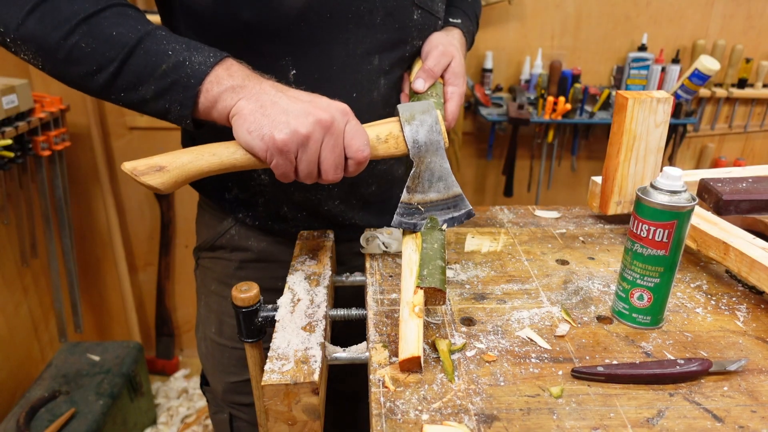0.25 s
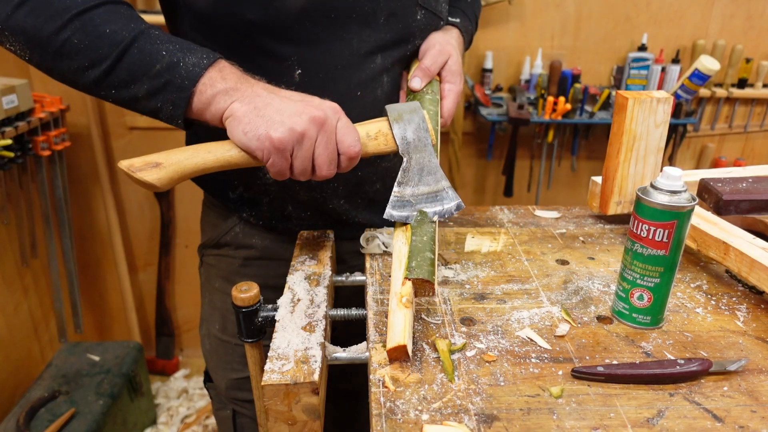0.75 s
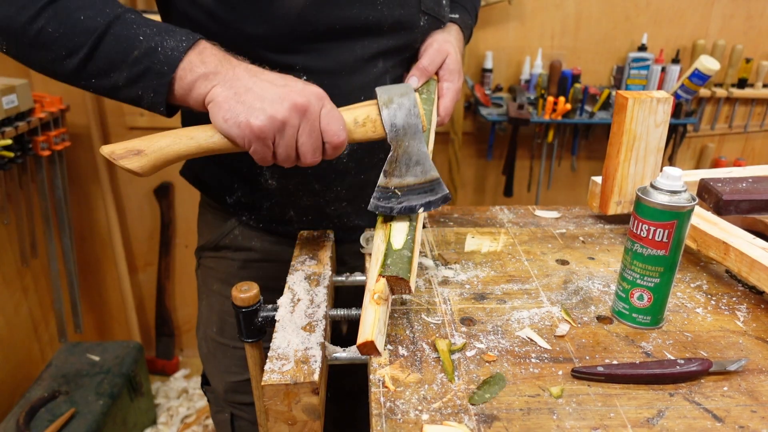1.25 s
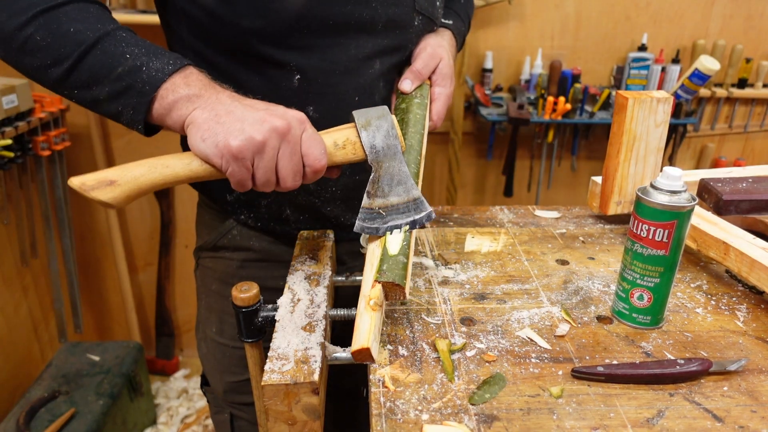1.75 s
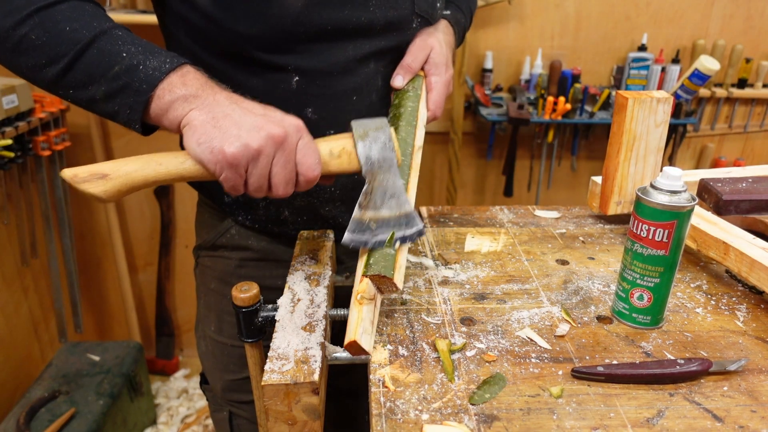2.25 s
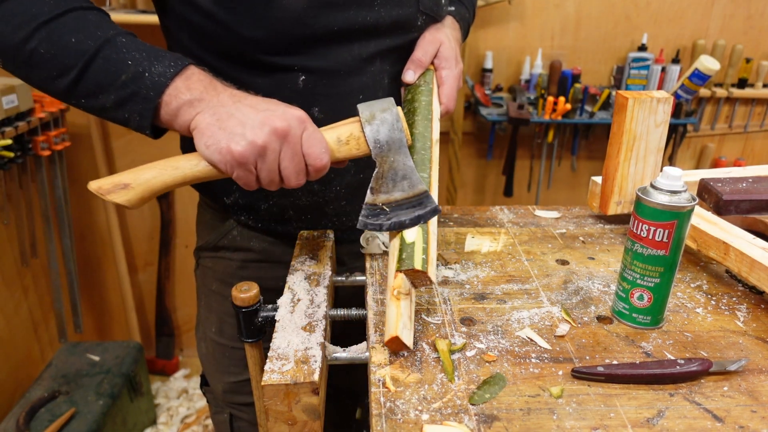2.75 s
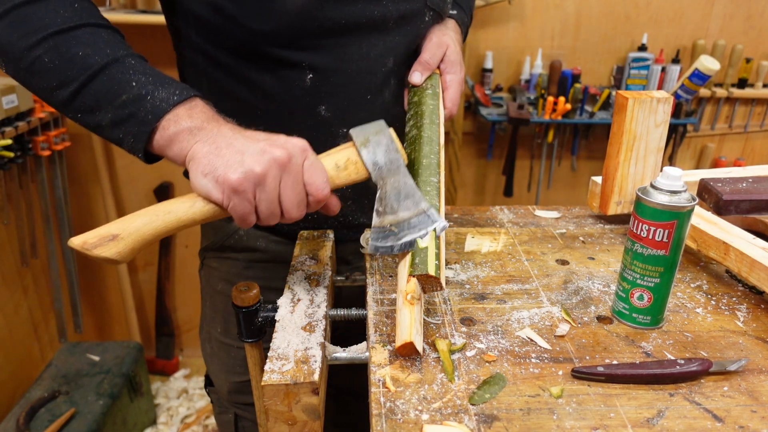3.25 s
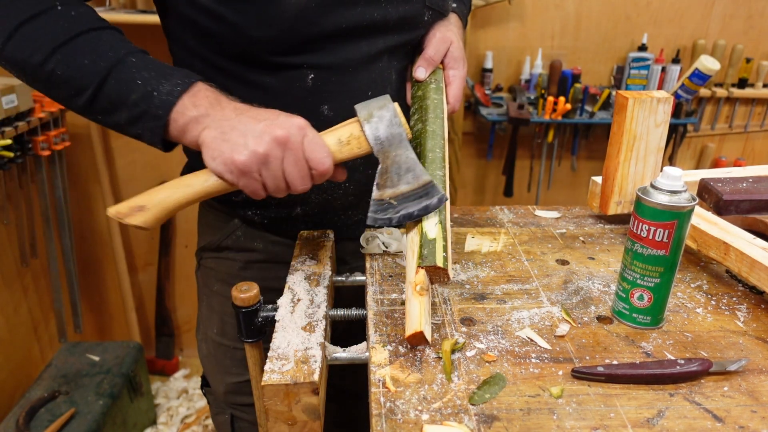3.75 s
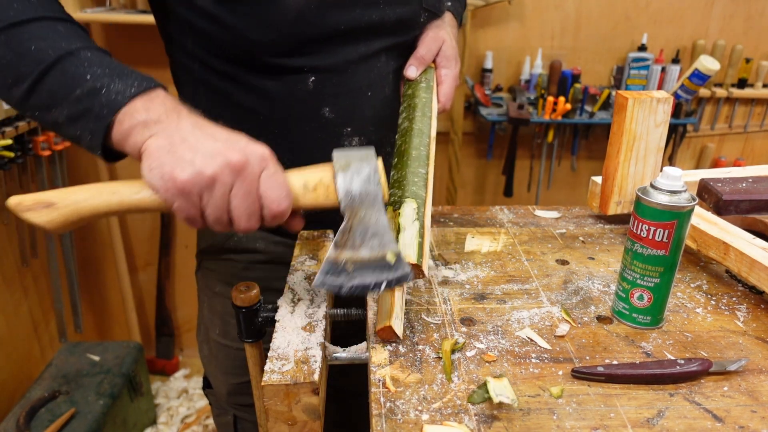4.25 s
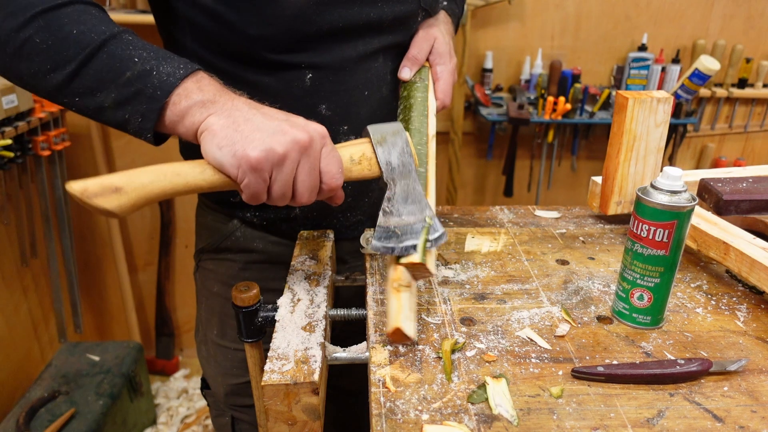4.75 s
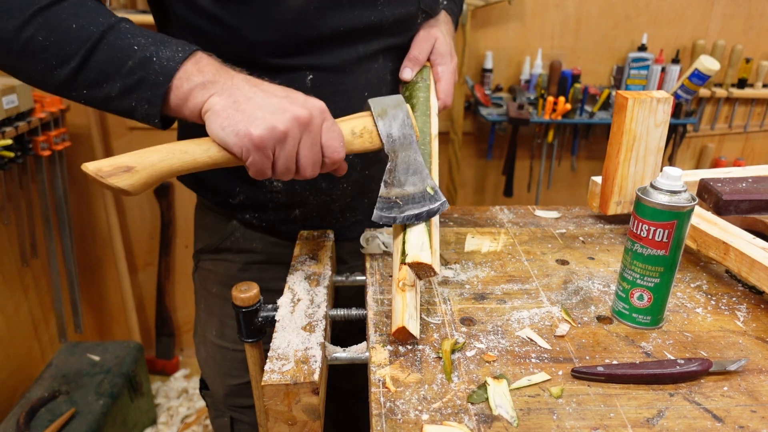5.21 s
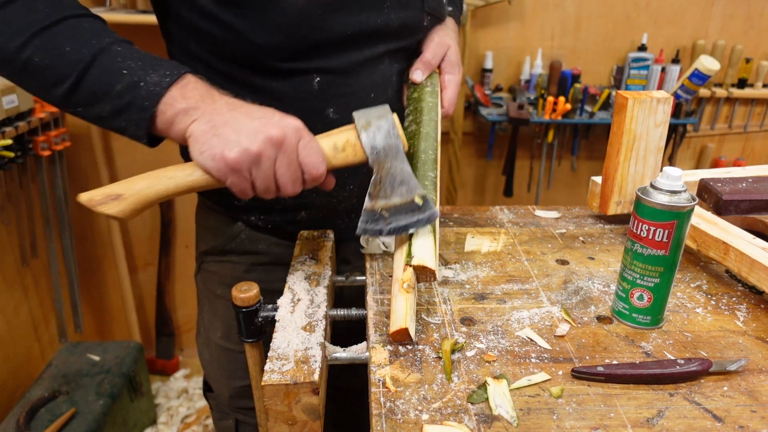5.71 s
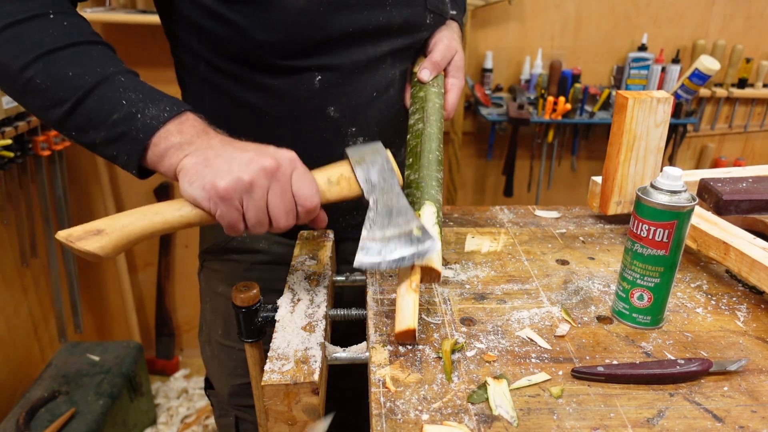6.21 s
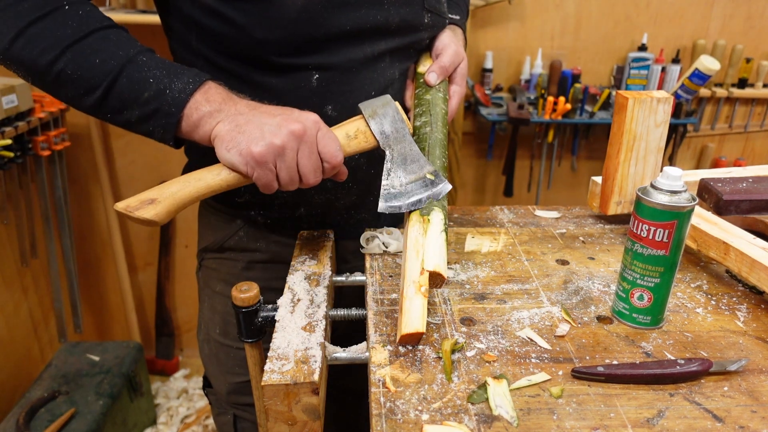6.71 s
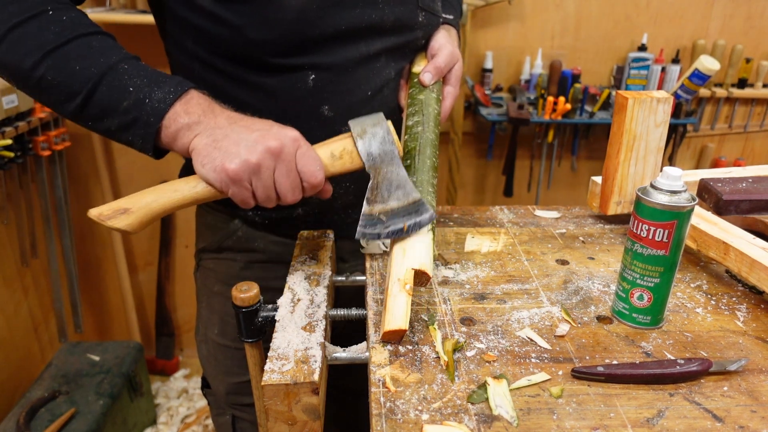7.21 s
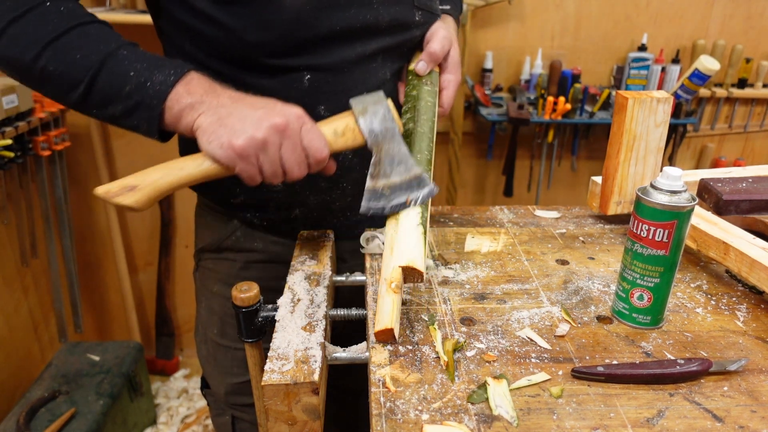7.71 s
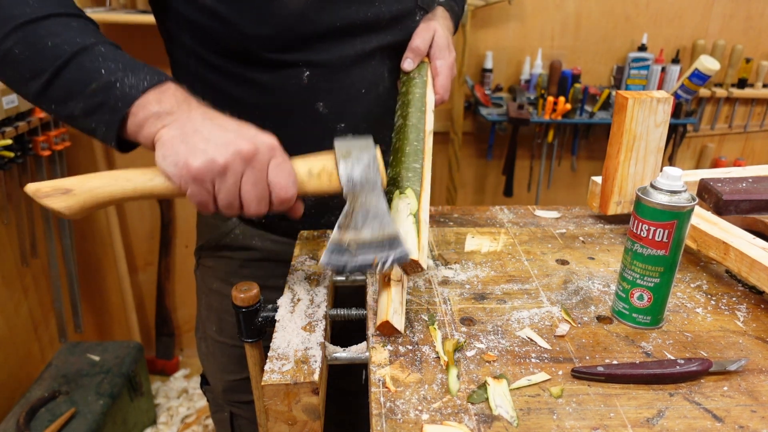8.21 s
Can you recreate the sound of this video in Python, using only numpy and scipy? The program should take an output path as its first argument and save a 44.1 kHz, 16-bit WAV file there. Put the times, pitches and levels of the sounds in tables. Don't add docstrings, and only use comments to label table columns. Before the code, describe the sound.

A hatchet shaves a green stick on a heavy bench, heard very close in a small workshop. It opens with a woody scrape fading into a soft rub. At 0.8 s a harsh, bright rip ends in a double knock at 0.9; a light tap follows. Soft set-downs and faint rubbing fill 1.3 to 1.9. A longer tearing rasp runs 2.2 to 2.35, then small jolts. At about 3.3 comes the sharpest rip, then lighter rubbing. Short scrapes lead to another strong rip and knock near 4.05. Rasps return at 4.6, 4.8 and 5.4. A scrape from 5.9 ends with knocks at 6.13 and a very loud one at 6.26. More tearing at 6.6 and 6.8, a heavy knock at 6.97, a knock cluster from 7.5 to 7.75, and a last rip and crack around 8.1. Chips tick throughout over low bench sway and faint air, with short echoes.

```python
import sys
import numpy as np
from scipy import signal
from scipy.fft import rfft, irfft, next_fast_len
from scipy.io import wavfile
from scipy.ndimage import uniform_filter1d

SR = 44100
rng = np.random.default_rng(int(sys.argv[2]) if len(sys.argv) > 2 else 0)


def pcm_store(signal):
    levels = np.round(np.clip(np.atleast_2d(signal), -1, 1) * 32767)
    wavfile.write(sys.argv[1], SR, levels.astype(np.int16).T)


def makeup_ratio(level_db):
    decades = np.asarray(level_db, float) / 20
    return 10 ** decades


N = 373527
TIME = np.arange(N) / SR
FIRM_DB = -44.5


def unit(x):
    return x / np.sqrt(np.mean(x ** 2))


def colour(x, table):
    hz, db = np.transpose(table)
    size = next_fast_len(len(x))
    f = np.arange(size // 2 + 1) * SR / size + 1
    gain = makeup_ratio(np.interp(np.log(f), np.log(hz), db))
    return irfft(rfft(x, size) * gain, size)[:len(x)]


def band(x, lo_hz, hi_hz):
    edges = [lo_hz, min(hi_hz, .45 * SR)]
    return signal.sosfilt(signal.butter(2, edges, "bandpass", fs=SR, output="sos"), x)


def ring(force, hz, t60):
    r, w = 1000 ** (-1 / (t60 * SR)), 2 * np.pi * hz / SR
    return signal.lfilter([0, r * np.sin(w)], [1, -2 * r * np.cos(w), r * r], force)


def body(force, modes):
    return sum((-1) ** k * makeup_ratio(db) * ring(force, hz, t60) for k, (hz, db, t60) in enumerate(modes))


def driven(force, gain, modes):
    rung = sum(makeup_ratio(db) * ring(force * gain * makeup_ratio(2.5 * walk(18)), hz, t60) for hz, db, t60 in modes)
    return rung / np.std(body(force, modes))


def add(track, s, piece):
    i = int(s * SR)
    track[i:i + len(piece)] += piece[:N - i]


def walk(rate):
    k = int(SR / rate)
    held = np.repeat(rng.standard_normal(N // k + 1), k)
    return 1.115 * uniform_filter1d(held, k)[:N]


# (frequency [Hz], level [dB per Hz])
TEAR = [(600, -5), (1500, -5), (3000, 9.5), (4500, 8), (7000, -2.5), (13000, -11.5), (16000, -11)]
# (frequency [Hz], level [dB], t60 [s])
WOOD = [(441, -13, .07), (515, -7, .11), (625, -12, .07), (680, -12, .07), (780, -12, .06), (870, -13, .06),
        (960, -12, .07), (1060, -13, .06), (1250, -15, .05), (1480, -17, .05)]
# (frequency [Hz], level [dB], t60 [s])
VICE = [(168.4, -9, 0.3), (224, -7, 0.2), (267.9, 0.5, .13), (326, 0, 0.044)]
# (frequency [Hz], level [dB], t60 [s])
STEEL = [(3155, -2.5, 0.019), (7205, -14, 0.01)]
# (frequency [Hz], level [dB], t60 [s])
SHAVING = [(1520, -6, .009), (2300, -3, .007), (3000, 0, .007), (3900, -6, .007), (4700, -9, .007)]
# (frequency [Hz], level [dB], t60 [s])
HELD = [(290, -1, 0.02), (861, -1, 0.015), (1350, -2.5, 0.0053), (2155, -17, 0.0098)]


def strokes():
    tear_db, bright_db, wood_db, steel_db = pressure()
    touch = uniform_filter1d(makeup_ratio(tear_db + 1.5 * walk(40)), size=int(0.018 * SR))
    breaks = rng.random(N) < 7000 / SR
    fibres = breaks * rng.standard_normal(N) * makeup_ratio(1.5 * rng.exponential(size=N))
    fibres = unit(fibres) * makeup_ratio(2.6 * np.clip(walk(110), -1.5, 1.5))

    torn = colour(fibres, TEAR)
    rasp = unit(band(torn, 1330, 9000))
    bright = unit(band(torn, 5550, 12200))
    deep = unit(band(torn, 270, 2100))
    rasp_db = -1.5 + 0.37 * (tear_db - FIRM_DB)
    hiss = makeup_ratio(rasp_db) * rasp + makeup_ratio(bright_db - 17) * bright + makeup_ratio(wood_db - 15) * deep

    rings = [(SHAVING, -6), (WOOD + VICE, wood_db - 9), (HELD, wood_db - 9.5)]
    rings += [(STEEL[:1], steel_db - 7), (STEEL[1:], steel_db + bright_db - 11)]
    return touch * hiss + sum(driven(fibres, touch * makeup_ratio(db), modes) for modes, db in rings)


# (start [s], end [s], first tearing level [dB], last tearing level [dB], wood share [dB])
BITES = [(0.0, .06, -44, -56, 10.5), (.826, .84, -37, -53.5, 3), (2.23, 2.274, -57, -37.5, -28),
         (3.845, 3.892, -56, -58, -7), (3.93, 3.97, -58, -64, 5), (3.985, 4.026, -48, -48, 5),
         (4.53, 4.69, -53, -44.5, 3.5), (5.3, 5.36, -59, -53, -4), (5.36, 5.43, -40, -55, 1.5),
         (5.86, 6.0, -54.5, -55, 9.5), (6.74, 6.88, -58.5, -43, 7), (6.88, 6.96, -54.5, -46.5, 13),
         (7.37, 7.5, -52, -57, 9)]
RIPS = [(.785, .812, -51, -60, -10), (.841, .9, -32, -39.5, 2), (2.274, 2.35, -38.5, -40, -3),
        (2.51, 2.6, -58, -59, 11.5), (2.865, 2.883, -56, -39, -2.5), (2.925, 3.031, -61.5, -51, 7),
        (3.2, 3.24, -50, -49, 1.5), (3.285, 3.325, -46, -39.5, 0.5), (3.326, 3.356, -30.5, -31, -8),
        (4.045, 4.076, -33.5, -36.5, 0.5), (4.76, 4.816, -60, -38, -14), (6.0, 6.125, -49.5, -39, 3.5),
        (6.592, 6.68, -36.5, -55.5, 4), (8.0, 8.072, -43.5, -35.5, -0.5), (8.085, 8.242, -51.5, -64, 1)]
RUBS = [(.06, .192, -53, -50.5, 7.5), (.45, .685, -70, -70, 20), (1.49, 1.56, -51, -55, 3),
        (1.56, 1.86, -59, -60, 3), (2.73, 2.8, -51, -68, -5), (2.8, 2.86, -63, -62.5, 14.5),
        (3.05, 3.19, -59.5, -67, 1), (3.37, 3.5, -51.5, -56, 14), (3.59, 3.68, -57, -61, 12),
        (4.86, 4.92, -60.5, -66, 14.5), (5.055, 5.075, -56, -66, 2), (6.3, 6.39, -50, -69.5, 11),
        (7.78, 7.815, -54, -60.5, -11), (7.86, 7.945, -55, -53.5, -7)]


def pressure():
    let_go_db = 33
    tear, wood, bright, steel = np.full((4, N), -90.)
    # (strokes, brightness [dB], steel share [dB], release [dB per s])
    kinds = [(BITES, 0, 3.3, 1200), (RIPS, 4.5, -16.5, 630), (RUBS, 5, -11, 270)]
    for rows, kind_bright_db, steel_db, release in kinds:
        for start, stop, first_db, last_db, wood_db in rows:
            end = stop + let_go_db / release
            db = np.interp(TIME, [start, stop, end], [first_db, last_db, last_db - let_go_db])
            on = (TIME >= start) & (TIME < end) & (db > tear)
            tear[on], steel[on] = db[on], steel_db
            wood[on] = wood_db + 0.361 * (max(first_db, last_db) - db[on])
            bright[on] = kind_bright_db + 0.93 * (db[on] - FIRM_DB)
    return tear, bright, wood, steel


def contact_push(noise, contact):
    t = TIME[:9000]
    settle = 0.0034
    rattle = makeup_ratio(-21) * noise * t / settle * np.exp(-t / settle)
    bump = np.maximum(1 - (2 * t / contact - 1) ** 2, 0)
    softened = np.convolve(rattle, bump[:90])[:9000] / np.sqrt(np.sum(bump ** 2) * np.sum(bump))
    push = softened + bump / np.sum(bump)
    bounce_s = .021 * (1 + 0.31 * np.tanh(noise[0]))
    push += makeup_ratio(-8) * np.roll(push, int(SR * bounce_s))
    return push, bump


def shake(bands, noise):
    t = TIME[:len(noise)]
    return sum(makeup_ratio(db) * unit(band(noise, lo, hi)) * 1000 ** (-t / t60) for lo, hi, db, t60 in bands)


# (time [s], stick level [dB], shove into the bench [dB], crack level [dB])
SET_ONS = [(1.341, -18, -32.5, -15.5), (2.097, -23.5, -35, -42), (2.783, -28.5, -28.5, -28),
           (3.841, -28, -31.5, -31), (4.46, -22.5, -35, -46), (5.263, -24, -32, -36),
           (5.815, -22.5, -30, -15), (6.562, -32.5, -32.5, -8), (7.292, -27, -28.5, -29)]
DROPS = [(.894, -21.5, -54, -20), (.92, -15, -19.5, -25), (4.091, -22, -20.5, -26), (6.127, -18, -13, -22),
         (6.261, -0.5, -13.5, -19), (6.973, -8, -8.5, -51), (7.52, -17, -14.5, -8.5),
         (7.619, -14, -17, -52), (7.641, -24.5, -43, -9), (7.755, -36.5, -26, -11), (8.101, -31, -29.5, 2)]
JOLTS = [(.796, -49, -48, -22), (1.525, -32.5, -34, -5), (2.306, -32.5, -28.5, 7.5), (2.405, -30, -45, -29),
         (2.56, -32.5, -36, 9), (4.64, -28.5, -45, -20), (4.818, -35.5, -30, -13), (5.425, -30, -26, 3.5)]
TAPS = [(1.089, -36.5, -59, -4), (3.038, -34.5, -65, -11), (3.201, -33.5, -53, -15), (4.25, -37.5, -26, -2),
        (4.971, -38, -55, -23), (7.141, -39, -51, -14)]
# (low edge [Hz], high edge [Hz], level [dB], t60 [s])
SHAKE = [(356, 818, -7, 0.15), (875, 1000, -29.5, 0.23), (1600, 2020, -19, 0.13)]
# (low edge [Hz], high edge [Hz], level [dB], t60 [s])
CRACK = [(1400, 2900, -1.5, 0.04), (2520, 8100, -19, 0.097)]
# (frequency [Hz], t60 [s])
BENCH = [(48.5, 0.7), (89, 0.35)]


def knocks():
    stick, vice, boards, sway, top = np.zeros((5, N))
    rise = 1 - np.exp(-TIME[:9000] / 0.0011)
    soft = np.hanning(300) / 150
    # (knocks, bench top over sway [dB], vice [dB], contact [s])
    kinds = [(SET_ONS, 5.4, -0.9, 0.0011), (DROPS, -1.8, 1.7, 0.00026),
             (JOLTS, 3.18, -1, 0.0014), (TAPS, -30, -21, 0.00014)]
    for rows, top_db, jaw_db, contact in kinds:
        for (s, db, sway_db, crack_db), noise in zip(rows, rng.standard_normal((len(rows), 9000))):
            push, bump = contact_push(noise, contact)
            add(stick, s - .001, makeup_ratio(db - 5.0) * push)
            vice_db = db + jaw_db - 0.5 * (db + 27.5) - 1.5
            add(vice, s, makeup_ratio(vice_db) * push)
            rattle = np.convolve(shake(SHAKE, noise), bump[:90:2] / np.sum(bump[::2]))[:9000]
            crack = makeup_ratio(crack_db - 5.5) * shake(CRACK, noise)
            add(boards, s, makeup_ratio(db) * (rise * rattle + crack))
            add(sway, s + 0.005, makeup_ratio(sway_db + 2.5) * soft)
            add(top, s + 0.0034, makeup_ratio(sway_db + top_db + 5.5) * soft)
    blows = body(stick, WOOD) + body(vice, VICE) + boards
    bench = ring(sway, *BENCH[0]) + ring(top, *BENCH[1])
    return blows, bench


# (time [s], level [dB], brightness [dB])
GRIT = [(.0226, -38, -1), (.0664, -39, -6), (.2722, -44, -8), (.3044, -48, -4), (.5175, -51, 0),
        (.8273, -35.5, 2), (1.4968, -38, -10), (4.0158, -31, 0), (5.8705, -41.5, -6),
        (6.2635, -14.5, -13.5), (6.9057, -38.5, -1.5)]
TOUCHES = [(1.3411, -38, -8), (2.0951, -46.5, 2), (3.8405, -54, -1), (4.4599, -50, -4), (5.2635, -55, 2),
           (5.8148, -34, -38), (7.2911, -30.5, -9)]
SNAPS = [(.8414, -43, 21), (.8565, -25.5, 11.5), (.8797, -24, 19.5), (1.5331, -30.5, -3),
         (1.7821, -44, -32), (2.9757, -39, -23), (3.0394, -44, 6.5), (3.3345, -21.5, -34),
         (4.0477, -28, -32), (5.432, -29, -39), (6.0084, -33, 2), (6.872, -29.5, -29), (7.549, -39, -22)]
CHIPS = [(1.0868, -39, 1), (1.094, -29, -14.5), (1.1781, -35.5, -19), (2.552, -43, -9), (2.5635, -58, 7),
         (3.2045, -36.5, 1), (3.35, -42, -6), (4.2494, -26.5, -1.3), (4.97, -44.5, -15), (6.133, -23, -37),
         (6.2265, -43, 3), (6.594, -24, 0), (6.9686, -21, -14), (7.1404, -39, -11), (7.3888, -32.5, -16),
         (7.517, -28.5, -22)]
# (frequency [Hz], level [dB], t60 [s])
EDGE = [(7170, -16, 0.12)]


def ticks():
    snaps, force, edge = np.zeros((3, N))
    t = TIME[:1800]
    fade = (1 - np.exp(-t / .0005)) * (np.exp(-t / .0012) + makeup_ratio(-17) * np.exp(-t / .012))
    # (ticks, steel ring [dB], centre of the bright part [Hz])
    kinds = [(GRIT, -4.5, 7250), (TOUCHES, 3.05, 6600), (SNAPS, -0.75, 4180), (CHIPS, -31, 4800)]
    for rows, steel_db, hz in kinds:
        for (s, db, bright_db), noise in zip(rows, rng.standard_normal((len(rows), 1800))):
            burst = noise * fade
            low = band(band(burst, 1010, 4540), 1010, 4540)
            high = band(burst, hz / 1.29, hz * 1.55)
            snap = low / np.max(np.abs(low)) + makeup_ratio(bright_db) * high / np.max(np.abs(high))
            add(snaps, s, makeup_ratio(db) * snap)
            add(force, s, makeup_ratio(db + steel_db) * np.ones(1))
            if rows is TOUCHES:
                add(edge, s, makeup_ratio(db + bright_db) * noise[:40] / 3)
    return snaps + body(force, STEEL) + body(edge, EDGE)


# (start [s], end [s], frequency [Hz], level [dB])
SLIDES = [(2.8, 3.18, 6080, -72), (2.9, 3.19, 4950, -74), (6.36, 6.55, 5000, -75), (5.95, 6.09, 5200, -64)]


def slides():
    rub = rng.standard_normal(N) * makeup_ratio(2.0 * walk(50))
    out = 0
    for start, end, hz, db in SLIDES:
        contact = uniform_filter1d(1. * (TIME > start) * (TIME < end), size=1500)
        out = out + makeup_ratio(db) * unit(ring(rub, hz, 0.015)) * contact
    return out


# (time [s], level [dB])
LEAN = [(0.0, -35), (.27, -30.5), (.7, -50), (.97, -31), (1.3, -39), (2.06, -49), (2.41, -31), (2.93, -50),
        (3.54, -34), (3.91, -51), (4.12, -19.5), (4.47, -41.5), (4.71, -31.5), (5.25, -68), (5.5, -37),
        (5.82, -54), (7.199, -37.5), (8.47, -42)]


def lean():
    arm_s, arm_db = np.transpose(LEAN)
    sway_gain = makeup_ratio(np.interp(TIME, arm_s, arm_db))
    press = uniform_filter1d(makeup_ratio(pressure()[0] - FIRM_DB), size=int(0.03 * SR))
    top_gain = makeup_ratio(-40) * (press + 0.051) ** .5
    out = 0
    for (hz, _), gain in zip(BENCH, [sway_gain, top_gain]):
        phase = 2 * np.pi * np.cumsum(hz * (1 + .07 * walk(14))) / SR
        tremble = makeup_ratio(3 + 2.5 * uniform_filter1d(walk(16), size=900))
        out = out + gain * tremble * np.sin(phase)
    return out


# (frequency [Hz], t60 [s])
ROOM_T60 = [(100, 0.48), (500, 0.27), (2000, 0.35), (6000, 0.3), (16000, 0.22)]


def room(x):
    t, tail = TIME[:int(.7 * SR)], 0
    hz, t60 = np.transpose(ROOM_T60)
    for f in 90 * 2. ** np.arange(8):
        decay = 1000 ** (-t / np.interp(np.log(f), np.log(hz), t60))
        tail = tail + band(rng.standard_normal(len(t)), f / np.sqrt(2), f * np.sqrt(2)) * decay
    tail *= np.clip((t - .004) / 0.0009, 0, 1)
    return signal.fftconvolve(x, makeup_ratio(-16.5) * tail / np.sqrt(np.sum(tail ** 2)))[:N]


# (frequency [Hz], level [dB per Hz])
AIR = [(15, -63), (25, 11.5), (70, -2), (141, -12.5), (330, -25.5), (2800, -43), (14800, -49.5),
       (16000, -74.5)]


def air():
    hush = colour(rng.standard_normal(N), AIR)
    return hush * makeup_ratio(-49.5) / np.std(band(hush, 94, 14000))


def scene():
    blows, bench = knocks()
    work = strokes() + slides() + blows + ticks()
    return (work + room(work) + bench + lean() + air())[None]


def low_pass(x):
    return signal.sosfilt(signal.butter(12, 16510, fs=SR, output="sos"), x)


def record(dry):
    dry = signal.sosfilt(signal.butter(3, 36, "highpass", fs=SR, output="sos"), dry)
    mix = np.tanh(dry * 1.189) / 1.027
    return low_pass(mix)


dry = scene()
out = record(dry)
pcm_store(out)
```